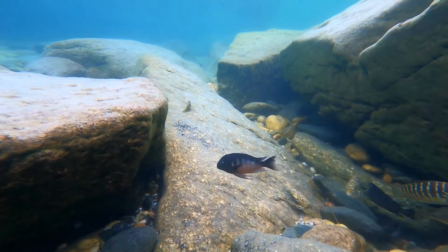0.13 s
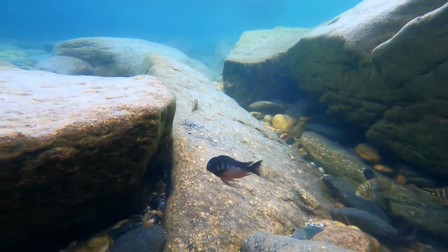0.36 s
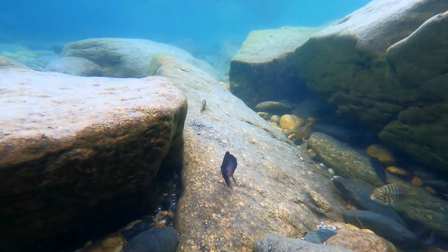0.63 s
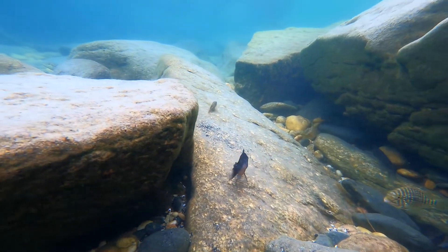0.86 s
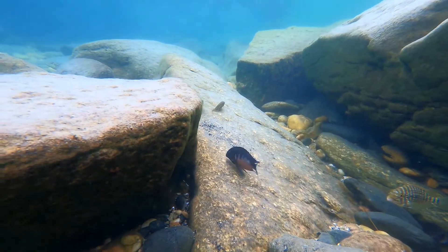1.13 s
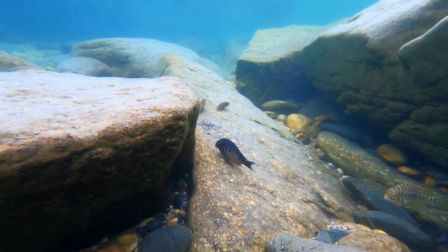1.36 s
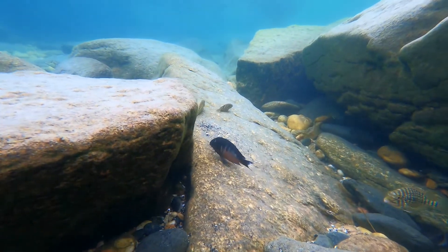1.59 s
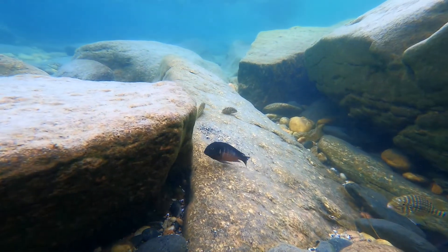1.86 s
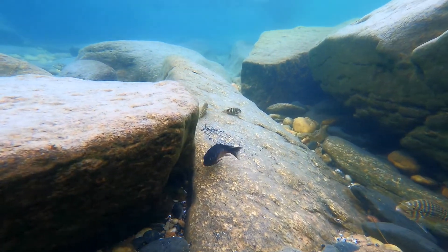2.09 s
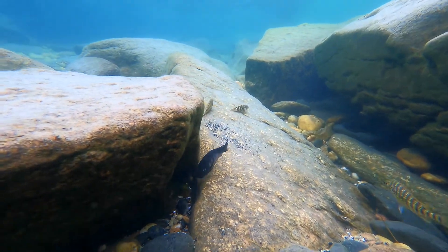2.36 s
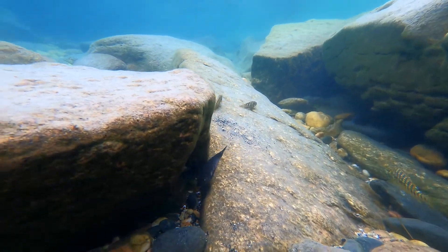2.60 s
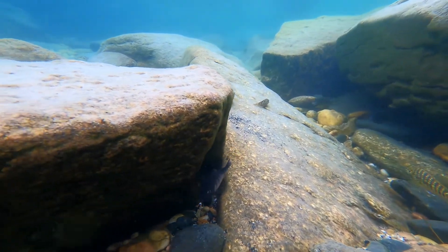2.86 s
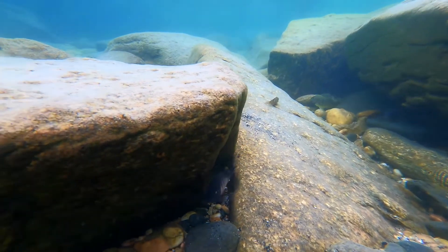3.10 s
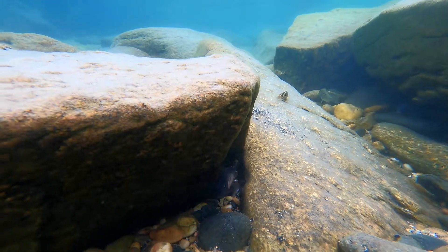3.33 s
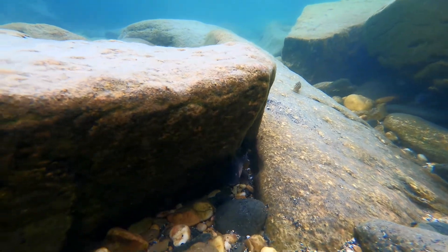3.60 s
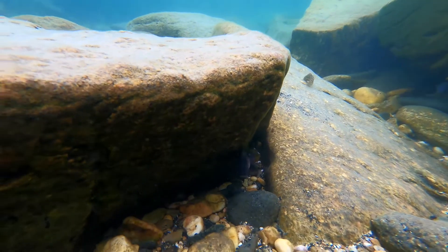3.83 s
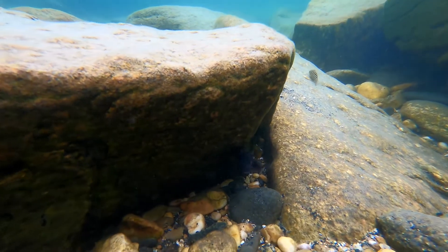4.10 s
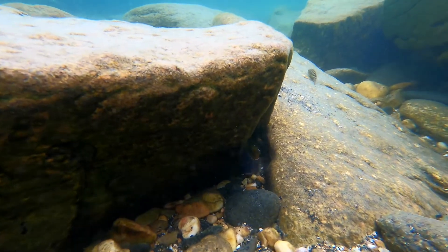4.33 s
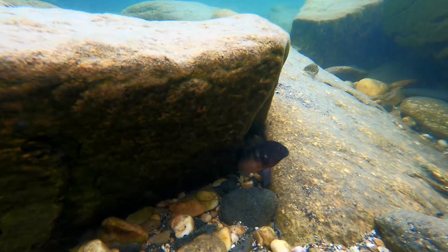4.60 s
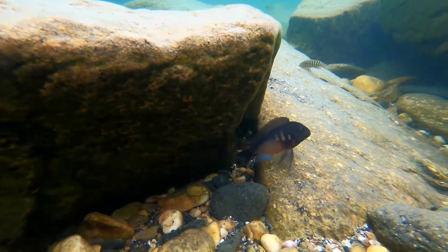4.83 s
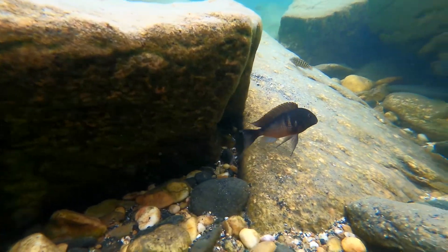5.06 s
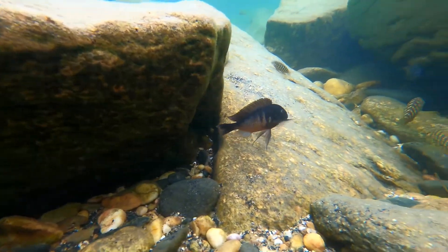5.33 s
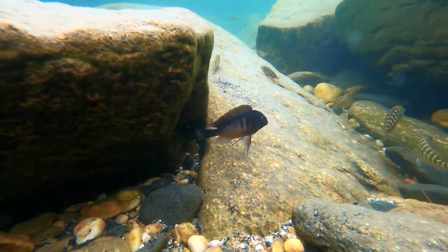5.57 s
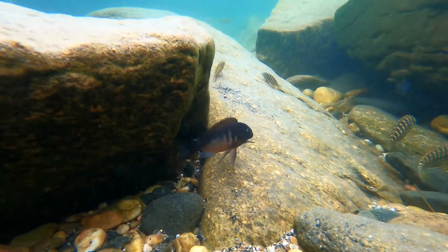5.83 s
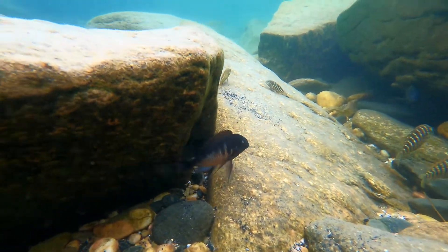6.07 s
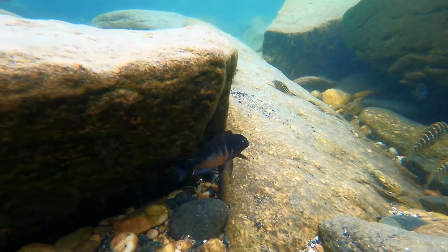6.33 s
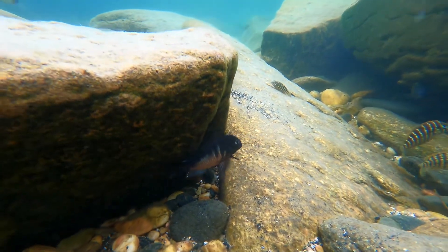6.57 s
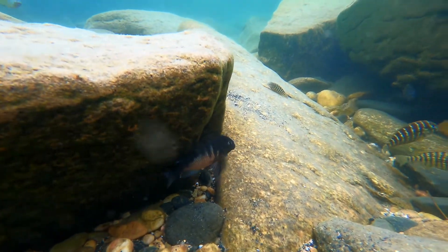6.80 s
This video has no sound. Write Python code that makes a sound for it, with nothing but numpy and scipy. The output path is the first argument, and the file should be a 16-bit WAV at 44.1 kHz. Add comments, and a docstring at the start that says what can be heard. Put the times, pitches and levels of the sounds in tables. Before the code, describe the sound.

Underwater in a shallow lake, a low uneven rumble throbs against a sealed camera while faint bubbles, grit ticks and a pebble knock sound over hiss.

```python
"""A low, uneven throb comes first: surges of lake water rock a small sealed camera between rocks.
Bubbles gurgle and ping as short gliding tones, a pebble knocks the hollow body in three decaying modes,
and grit ticks and crackles on the shell as clicks that ring its resonances.
Behind it lie the hiss of the two microphones, made of shaped noise, and a faint buzz of frame clock pulses."""
import sys
import numpy as np
from scipy import signal
from scipy.fft import rfft, irfft, next_fast_len
from scipy.io import wavfile
from scipy.ndimage import uniform_filter1d

SR = 44100
rng = np.random.default_rng(int(sys.argv[2]) if len(sys.argv) > 2 else 0)


def materialize(psi):
    """Save the field psi as 16-bit PCM at rate SR to the path in sys.argv[1].

    A 1-D psi becomes a single channel; in a 2-D psi each row is a channel.
    """
    bounded = np.clip(np.atleast_2d(psi).T, -1, 1)
    quanta = np.round(bounded * 32767).astype(np.int16)
    wavfile.write(sys.argv[1], SR, quanta)


def undo_db(level):
    """Turn decibels back into plain size, where 20 dB means ten times bigger."""
    steps = np.asarray(level, float) / 20
    return 10 ** steps


N = 306054  # length in samples

# surges that set the housing throbbing: crest t/s, level/dB, f/Hz, swell t/s, fade t/s
# (swell and fade run between the crest and 6 dB below it)
THROB_SURGES = [(.36, -38, 63, .05, .025), (.58, -33, 56, .07, .025), (.83, -31, 63, .025, .07),
                (1.03, -40, 66, .026, .024), (1.19, -36, 59, .028, .028), (1.41, -36, 66, .06, .06),
                (1.64, -42, 56, .04, .04), (1.84, -35, 61, .06, .05), (1.99, -28.5, 60, .08, .025),
                (2.29, -35, 59, .075, .028), (2.43, -39, 58, .021, .022), (2.69, -36, 54, .027, .022),
                (2.79, -35, 59, .023, .03), (3.02, -36, 60, .022, .024), (3.27, -33, 63, .063, .027),
                (3.5, -40, 57, .07, .05), (3.86, -42, 53, .1, .06), (4.08, -39, 53, .057, .021),
                (4.41, -33, 64, .025, .04), (4.62, -33, 62, .052, .031), (4.77, -30, 60, .035, .04),
                (4.95, -42, 62, .07, .029), (5.16, -40, 59, .04, .04), (5.27, -42, 54, .023, .02),
                (5.54, -43, 60, .028, .025), (5.7, -42, 59, .02, .02), (5.81, -37, 58, .021, .02),
                (5.91, -43, 64, .03, .03), (6.12, -45, 66, .024, .022), (6.27, -43, 59, .026, .022),
                (6.39, -31, 62, .024, .023), (6.53, -41, 61, .024, .028), (6.8, -27, 62, .03, .03)]
# slower pushes of water: crest t/s, level/dB, half length t/s (to 6 dB below the crest)
WATER_PUSHES = [(.04, -40, .05), (.42, -40, .06), (.59, -35, .03), (.84, -35, .035), (1.35, -33, .045),
                (1.6, -35, .028), (1.85, -38, .028), (2.2, -36, .1), (2.43, -37, .04), (2.7, -32, .05),
                (2.83, -31, .06), (3.03, -35, .08), (3.35, -36, .07), (3.6, -36, .045), (4.1, -32, .04),
                (4.3, -38, .05), (4.6, -39, .08), (4.82, -32, .04), (5.12, -36, .055), (5.28, -36, .05),
                (5.6, -39, .05), (5.82, -39, .05), (6.34, -33, .04), (6.68, -35, .09)]
# balance of the churning eddies over pitch: f/Hz, relative level/dB per Hz
CHURN_SPECTRUM = [(60, -13), (75, 11.5), (97, 4), (120, 0.5), (150, -9.5), (200, -53), (400, -120)]
# single bubbles: t/s, level/dB before the shake, middle f/Hz, length t/s, left over right level/dB
SINGLE_BUBBLES = [(0.9238, -51, 1690, .02, 3), (1.2012, -50.5, 1640, .01, -1),
                  (1.2755, -50.5, 1640, .013, -1), (1.3997, -47.5, 1730, .015, 2),
                  (1.6342, -51, 1650, .014, -5), (1.811, -45.5, 914, .012, 2),
                  (2.070, -41.5, 1660, .016, -1), (2.535, -48, 552, .026, .5), (3.8, -56, 2600, .009, 0),
                  (4.0696, -50, 1620, .013, 1), (4.115, -52, 1620, .015, 0), (4.163, -51, 1690, .014, 0),
                  (4.181, -41.5, 539, .033, 1.5), (4.234, -45, 676, .029, 5), (4.272, -51, 685, .011, -.5),
                  (4.732, -53.5, 740, .011, 3), (4.7646, -51, 1690, .012, 4),
                  (5.0604, -55, 2750, .012, 3.5), (5.0843, -56, 2515, .014, 3),
                  (5.3048, -56, 1100, .019, -4), (5.5844, -44, 1150, .0051, -3.5),
                  (6.082, -54, 683, .02, 8.5), (6.2098, -44, 1150, .01, -3), (6.2213, -44, 1740, .015, 0),
                  (6.251, -54, 700, .01, 3), (6.262, -57, 500, .012, 3), (6.2706, -51.5, 1570, .009, 3),
                  (6.447, -56, 2780, .008, 0), (6.4867, -52, 1160, .01, -4)]
# knocks of a pebble: t/s, peak level/dB, brightness/dB per octave, left over right level/dB
PEBBLE_KNOCKS = [(1.683, -42.5, 13, 1), (1.914, -52, 11, 4), (2.116, -41, 16.5, 0.0),
                 (2.143, -41.5, 16, -1.0), (2.2, -43, 1, 1), (2.269, -31, -12, 0.0), (2.299, -45, -9, -8),
                 (3.79, -49.5, 8, -1), (6.289, -48, 3, -2.5)]
# modes of the hollow body: f/Hz, relative level/dB, time to fall 60 dB t/s
HOLLOW_MODES = [(505, 1.5, 0.044), (765, 5.5, 0.032), (1100, -6, 0.023)]
# grit hitting the shell: t/s, level/dB, f/Hz, snap over that level/dB
GRIT_TICKS = [(1.3144, -44.5, 6400, 0), (1.4012, -45, 4600, 6), (1.5309, -41.5, 5180, 1),
              (1.6337, -44, 7030, -2), (3.262, -46, 5313, 5), (4.0248, -39, 1680, -12),
              (4.1081, -46, 5510, -2), (4.2882, -43, 5820, 0), (5.5199, -43, 1540, 2),
              (5.5374, -47, 1550, -2), (5.5434, -46, 1330, -6), (5.5554, -45, 1740, -3),
              (5.5974, -46.5, 1193, -2), (5.7189, -44, 1430, 0), (5.907, -42, 1540, 0),
              (5.9194, -45, 1422, -3), (6.0806, -41, 1510, 0), (6.0874, -51, 1100, -6),
              (6.0995, -49, 6400, 6), (6.103, -40.5, 1550, 0)]
# resonances of the shell: f/Hz, width f/Hz, relative level/dB
SHELL_MODES = [(1150, 390, 10.5), (1616, 150, 1.5), (4700, 1500, 0.5), (6000, 1600, 11.5), (8450, 790, -20)]
# loudness of the fine crackle over time: t/s, level/dB
CRACKLE_LEVEL = [(0, -67), (1, -69), (2, -68.5), (3.55, -71.5), (3.75, -59), (4.15, -61.5), (4.4, -70),
                 (5.3, -70), (5.6, -64.5), (6.3, -61.5), (6.94, -74)]
# colour of the microphone hiss: f/Hz, relative level/dB per Hz
HISS_SPECTRUM = [(90, -36.5), (140, 6), (192, -5), (285, -8), (878, -21), (1440, -14), (1680, -11),
                 (1860, -13), (2280, -21), (2950, -24), (3940, -22.5), (4590, -14), (5090, -19.5),
                 (6140, -21.5), (7660, -31.5), (8400, -38.5), (10700, -43.5), (11300, -56.5), (12000, -47),
                 (13000, -59.5)]
# likeness of the hiss in both microphones: f/Hz, likeness (0 unrelated, 1 equal)
HISS_LIKENESS = [(60, 0.78), (100, 0.38), (170, 0.39), (300, 0.067), (500, 0.23), (860, 0.78), (1460, 0.64),
                 (2490, 0.71), (4230, 0.97), (7210, 1.0), (9000, 0.24), (12000, .1)]
# side of the hiss: f/Hz, left over right level/dB
HISS_TILT = [(60, -6.5), (100, 2.5), (170, -6.5), (300, -7.5), (500, -8), (860, -5), (1460, -2.5),
             (2490, 3.5), (4230, -2), (7210, 2.5)]
# pulses within each frame: t/s after the start of the frame
CLOCK_PULSES = [.01385, .02620]
# ringing of each pulse: f/Hz, level/dB, time to fall 60 dB t/s
CLOCK_MODES = [(5420, -56, 0.0086), (6035, -60, 0.013), (9000, -95.5, .02), (10400, -87, .02)]
# phase of the left port: f/Hz, lead/rad (negative: it lags)
LEFT_LEAD = [(0, 0), (690, -.9), (1210, -1.1), (1720, -.1), (2330, -.8), (2840, -1.), (3450, -.6),
             (3880, -1.2), (4310, -.4), (4740, 0)]

# between surges the water never quite rests
REST_HZ, REST_THROB_DB, REST_SLOSH_DB, REST_FLUTTER_DB = 48, -56, -43, 3.0
# churn level at a -40 dB throb, dB it gains per dB of throb, and how late it follows
CHURN_DB, CHURN_SLOPE, CHURN_LAG_S = -52.5, 1.1, .03
GLIDE_HZ = 40  # how far a bubble rises over its length
PINGS_PER_S, PING_HZ, PING_SPREAD, PING_S = 22, 1660, .03, .011
PING_OVER_DB = 2.5  # offset from the crackle level, before each ping's own size
TICK_T60_S, TICK_DAMPING = .03, .55  # 60 dB fall at 1500 Hz; higher grains die sooner
HISS_DB = -54  # before the left-right tilt
FRAME_HZ = 30000 / 1001


def evened(x):
    """Scales a sound to an average (rms) size of 1."""
    return x / np.sqrt(np.mean(x ** 2) + 1e-20)


def read(points, hz):
    """Reads a table of values along a log-frequency axis."""
    f, value = np.transpose(points)
    return np.interp(np.log(hz + 1), np.log(f + 1), value)


def panned(db, left_over_right_db):
    """Gains for left and right, with the difference shared equally between them."""
    return undo_db(db + np.array([[.5], [-.5]]) * left_over_right_db)


def add(mix, s, sound):
    """Mixes a sound into both channels from time s."""
    part = mix[:, round(s * SR):][:, :sound.shape[-1]]
    part += sound[..., :part.shape[1]]


def wander(rate_hz):
    """Random drift of rms 1 that moves no faster than about rate_hz."""
    lowpass = signal.butter(2, rate_hz, fs=SR, output="sos")
    drift = signal.sosfiltfilt(lowpass, rng.standard_normal(N), padtype="even", padlen=SR)
    return evened(drift)


def noise(points, same, patchy_db, size):
    """Two-channel noise from random short-time spectra, with drifting louder and softer patches."""
    frames, hz = 4 * N // size + 5, np.fft.rfftfreq(size, 1 / SR)
    a, b, c, d, patches = rng.standard_normal((frames, len(hz), 5)).T
    patches = uniform_filter1d(patches, 10, 0)
    patches = evened(uniform_filter1d(patches, 10, 1))
    same = np.clip(same(hz), -1, 1)[:, None]
    left = a + 1j * b
    right = same * left + np.sqrt(1 - same ** 2) * (c + 1j * d)
    bass_boost = 1 + 600 / (hz[:, None] + 200)  # the bass billows most
    gain = undo_db(read(points, hz)[:, None] + patchy_db * patches * bass_boost)
    spectra = np.array([left, right]) * gain
    return evened(signal.istft(spectra, nperseg=size, noverlap=3 * size // 4)[1][:, :N])


def swells(rows, rest_db):
    """Power of each swell over time, bell-shaped, and of the restless water under them."""
    t = np.arange(0, N, 64)[:, None] / SR
    s, db, rise, fall = np.transpose(rows)
    side_s = np.maximum(np.where(t < s, rise, fall), .01)
    crest = undo_db(db - 6 * ((t - s) / side_s) ** 2) ** 2
    rest = undo_db(rest_db + REST_FLUTTER_DB * wander(7)[::64, None]) ** 2
    return np.hstack([crest, rest])


def surge():
    """The housing sways at a low pitch, lopsided so an octave appears, with slosh and churning eddies."""
    t, frames = np.arange(N) / SR, np.arange(0, N, 64) / SR
    power = swells([(s, db, rise, fall) for s, db, hz, rise, fall in THROB_SURGES], REST_THROB_DB)
    throb_db = np.interp(t, frames, 10 * np.log10(power.sum(1)))
    # the stronger swell pulls the pitch to its own
    pitches = [*np.transpose(THROB_SURGES)[2], REST_HZ]
    hz = np.interp(t, frames, power @ pitches / power.sum(1))
    loose = np.clip(0.0391 + 0.0118 * (-34 - throb_db), .02, .3)  # a weak sway loses its pitch
    phase = 2 * np.pi * np.cumsum(hz * (1 + loose * wander(12.07))) / SR
    sway = np.sin(phase) + undo_db(-18.5) * np.cos(2 * phase)
    throb = np.sqrt(2) * undo_db(throb_db) * sway

    pushes = swells([(s, db, half, half) for s, db, half in WATER_PUSHES], REST_SLOSH_DB)
    slosh_db = np.interp(t, frames, 10 * np.log10(pushes.sum(1)))
    roll = signal.hilbert(wander(70) - 1.02 * wander(19), next_fast_len(N))[:N]
    roll = roll.real / abs(roll) ** 0.79  # evens out most of the chance changes in size
    roll = signal.sosfiltfilt(signal.butter(3, 50, fs=SR, output="sos"), roll)
    slosh = undo_db(slosh_db) * evened(roll)

    late_throb_db = np.interp(t - CHURN_LAG_S, t, throb_db)
    churn_db = CHURN_DB + CHURN_SLOPE * (late_throb_db + 40)
    churn = undo_db(churn_db) * noise(CHURN_SPECTRUM, lambda f: 0.8 + 0 * f, 0.68, size=8192)
    return (throb + slosh + churn) * panned(0, -1.1)


def pings():
    """Rows for many small bubbles, one at a random moment in each slot, louder when the crackle is."""
    s = np.arange(.02, N / SR - .1, 1 / PINGS_PER_S)
    late, size, pitch, pan = rng.random((int(N / SR * 60), 4))[:len(s)].T
    s = s + late / PINGS_PER_S
    db = np.interp(s, *np.transpose(CRACKLE_LEVEL)) + PING_OVER_DB - 3.0 * np.log(size + .05)
    hz = PING_HZ * (1 + PING_SPREAD * np.tan(2.4 * (pitch - .5)))  # mostly close, a few far off
    return zip(s, db, hz, PING_S + 0 * s, 8 * (pan - .5))


def bubbles():
    """Each bubble sings a short, slightly shaky near-sine that glides as it changes depth and shape."""
    out, t = np.zeros((2, N)), np.arange(SR // 8) / SR
    shake_db = 2.5 * wander(110)
    for s, db, hz, length, pan_db in [*SINGLE_BUBBLES, *pings()]:
        u = t / max(length, 1e-3)
        shape = (1 - np.exp(-u / 0.09)) * np.exp(-u ** 3)
        tone = np.sin(2 * np.pi * t * (hz + GLIDE_HZ * (u - 1) / 2))
        add(out, s, panned(db, pan_db) * shape / shape.max() * tone)
    return out * undo_db(shake_db)


def knocks():
    """A pebble rings one set of hollow modes, each knock with its own brightness."""
    out, t = np.zeros((2, N)), np.arange(SR // 8) / SR
    middle_hz = HOLLOW_MODES[1][0]
    for s, db, bright_db, pan_db in PEBBLE_KNOCKS:
        ring = np.zeros(len(t))
        for hz, mode_db, t60 in HOLLOW_MODES:
            level_db = mode_db + bright_db * np.log2(hz / middle_hz)
            ring += undo_db(level_db - 60 * t / t60) * np.sin(2 * np.pi * hz * t)
        ring *= 1 - np.exp(-t / 0.0015)  # soft start
        add(out, s, panned(db, pan_db) * ring / abs(ring).max())
    return out


def shell(x):
    """Clicks ring the resonances of the housing, which take a moment to build."""
    t = np.arange(1500) / SR
    ring = np.zeros(len(t))
    for hz, width, db in SHELL_MODES:
        envelope = (1 - np.exp(-hz * t / 0.6)) * np.exp(-np.pi * width * t)
        ring += undo_db(db) * envelope * np.sin(2 * np.pi * hz * t)
    return signal.oaconvolve(x, ring[None], axes=1)[:, :N]


def ticks():
    """Each grain gives a sharp ring at its own pitch, and a snap coloured around it by the whole shell."""
    out, t = np.zeros((2, N)), np.arange(SR // 20) / SR
    scrapes = rng.standard_normal((len(GRIT_TICKS), 120)) * np.exp(-np.arange(120) / 15.0)
    for (s, db, hz, snap_db), scrape in zip(GRIT_TICKS, scrapes):
        t60 = TICK_T60_S * (1500 / hz) ** TICK_DAMPING
        envelope = undo_db(db - 60 * t / t60) * (1 - np.exp(-t / 0.00013))
        add(out, s, envelope * np.sin(2 * np.pi * hz * t))
        near = signal.butter(2, [hz / 1.97, min(hz * 1.2, 9000)], "bandpass", fs=SR, output="sos")
        snap = signal.sosfilt(near, shell(np.pad(scrape, (0, len(t)))[None]))
        add(out, s, undo_db(db + snap_db) * snap / abs(snap).max())
    return out


def crackle():
    """Many tiny random knocks, about 200 a second and a few of them larger, ring the shell."""
    size = undo_db(3.1 * np.minimum(rng.exponential(1, N), 2.8))
    clicks = size * (rng.random(N) < 200 / SR) * rng.choice([-1, 1], N)
    side = rng.standard_normal(N)
    grit = shell(clicks * panned(0, 5 * side))
    grit = signal.sosfilt(signal.butter(2, [900, 7500], "bandpass", fs=SR, output="sos"), grit)
    level_db = np.interp(np.arange(N) / SR, *np.transpose(CRACKLE_LEVEL))
    return undo_db(level_db) * evened(grit)


def hiss():
    """Microphone noise coloured by the sealed ports, mostly louder on the right at low pitch."""
    x = noise(HISS_SPECTRUM, lambda f: read(HISS_LIKENESS, f), 1.0, size=1024)
    tilt = panned(0, read(HISS_TILT, np.fft.rfftfreq(N, 1 / SR)))
    return undo_db(HISS_DB) * irfft(rfft(x) * tilt, N)


def frame_clock():
    """Two current pulses a frame ring briefly, too fast to count: a thin comb in the treble."""
    out = np.zeros(N)
    for s in CLOCK_PULSES:
        t = (np.arange(N) / SR - s) % (1 / FRAME_HZ)  # time since the latest pulse
        ring = sum(undo_db(db - 60 * t / t60) * np.sin(2 * np.pi * hz * t) for hz, db, t60 in CLOCK_MODES)
        out += (1 - np.exp(-t / 0.00023)) * ring
    return out


def scene():
    """Water, bubbles, pebbles, grit and the camera's own noise."""
    return surge() + bubbles() + knocks() + ticks() + crackle() + hiss() + frame_clock()


def top_cut(x):
    """Nothing passes above the cut-off."""
    return signal.sosfilt(signal.butter(12, 13400, fs=SR, output="sos"), x)


def record(dry):
    """The left port answers a little out of phase, by an amount that depends on pitch."""
    left = np.pad(dry[0], (0, N), "reflect")  # mirrored so that the end does not wrap to the start
    lead = np.interp(np.fft.rfftfreq(2 * N, 1 / SR), *np.transpose(LEFT_LEAD))
    left = irfft(rfft(left) * np.exp(1j * lead), 2 * N)[:N]
    return top_cut(np.array([left, dry[1]]))


dry = scene()
out = record(dry)
materialize(out)
```